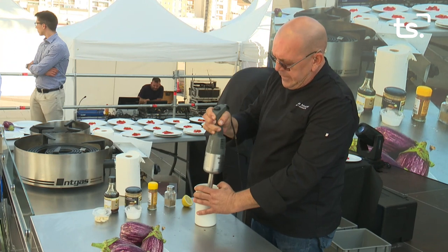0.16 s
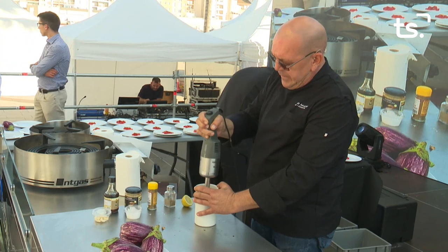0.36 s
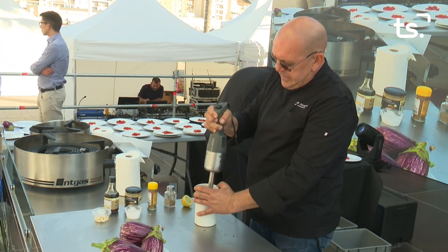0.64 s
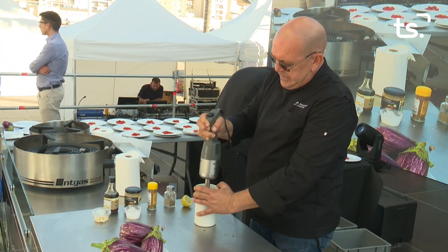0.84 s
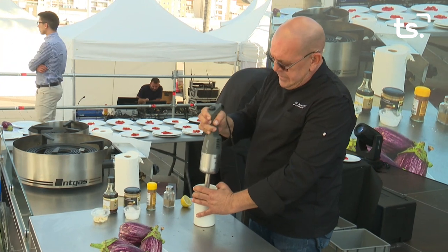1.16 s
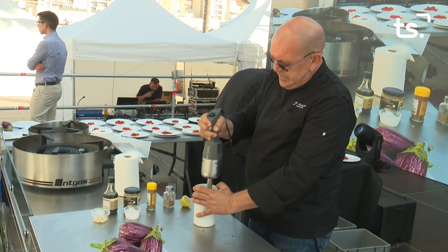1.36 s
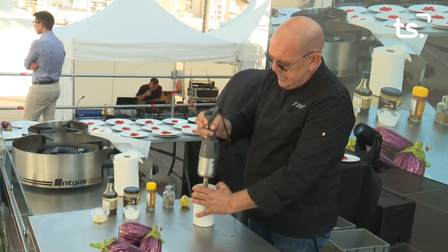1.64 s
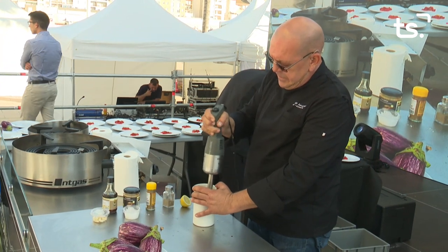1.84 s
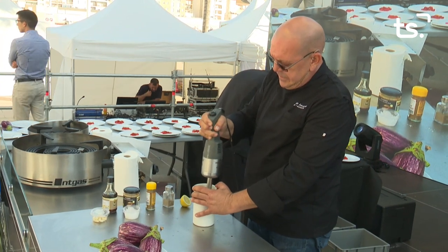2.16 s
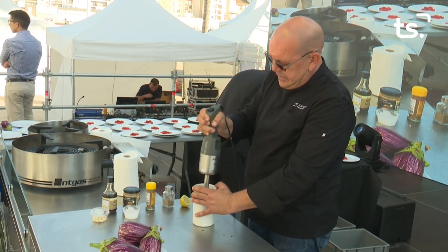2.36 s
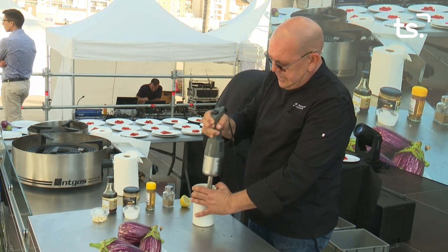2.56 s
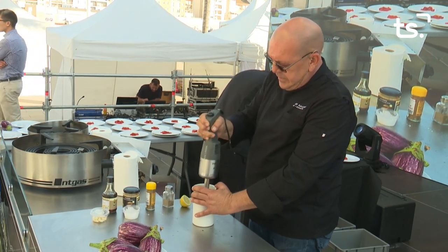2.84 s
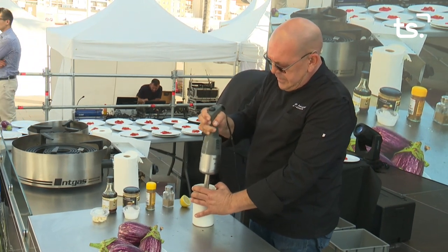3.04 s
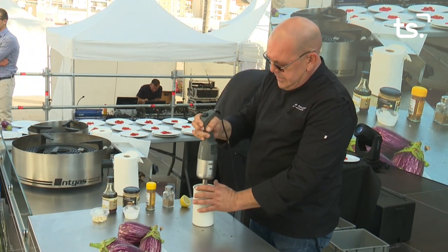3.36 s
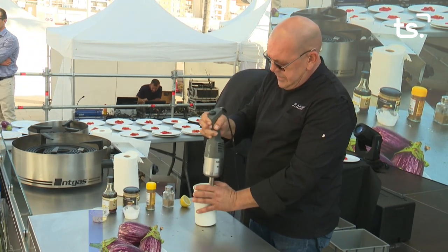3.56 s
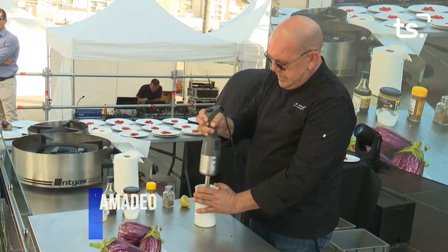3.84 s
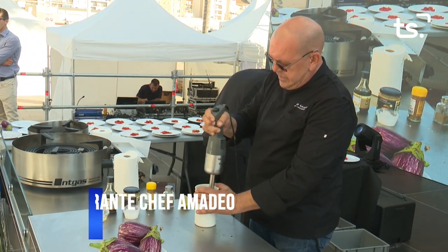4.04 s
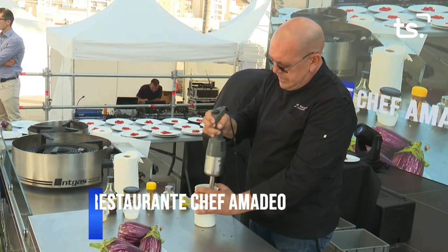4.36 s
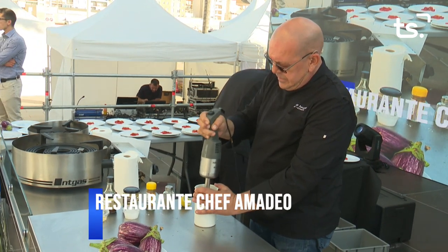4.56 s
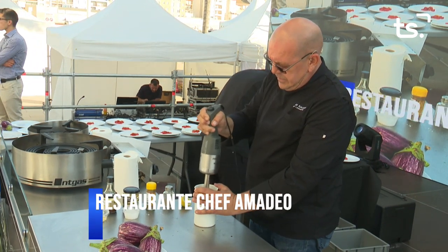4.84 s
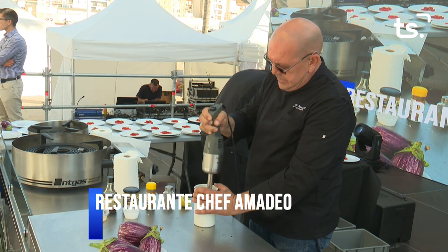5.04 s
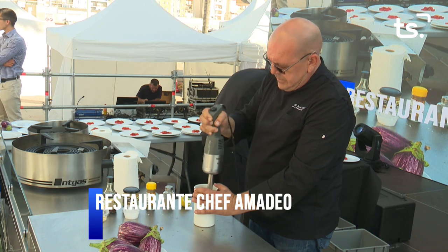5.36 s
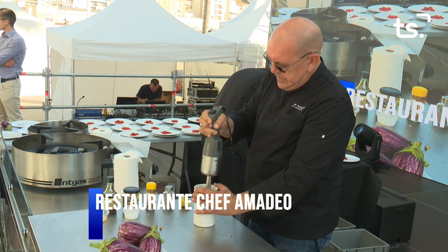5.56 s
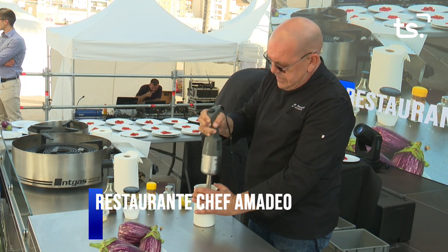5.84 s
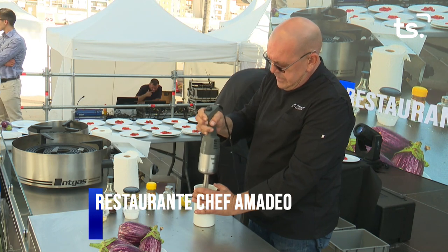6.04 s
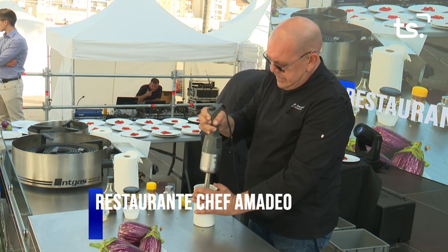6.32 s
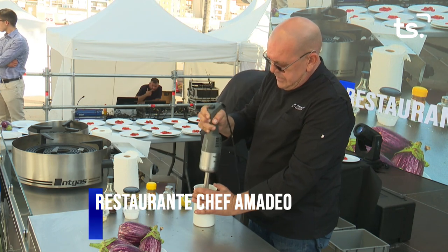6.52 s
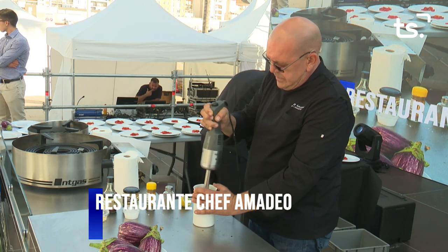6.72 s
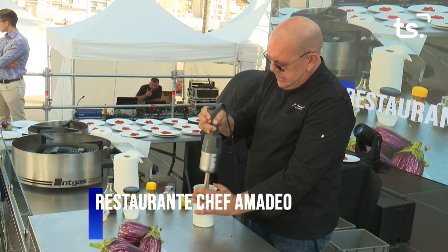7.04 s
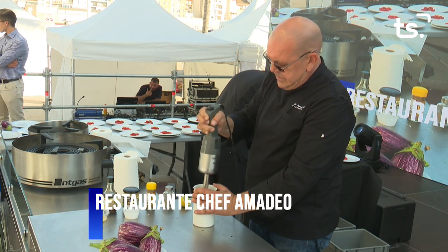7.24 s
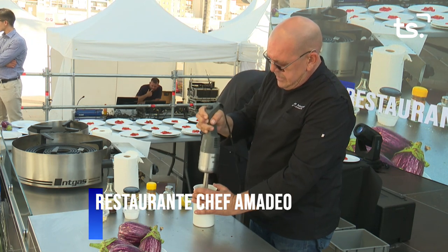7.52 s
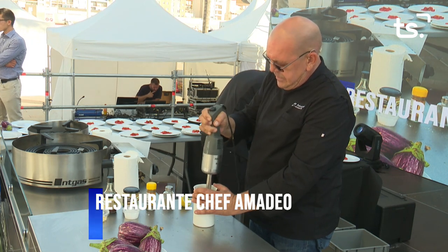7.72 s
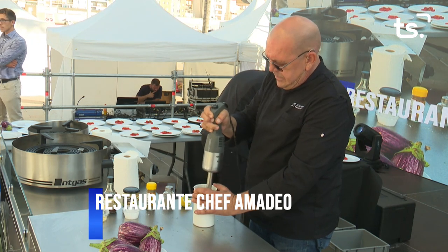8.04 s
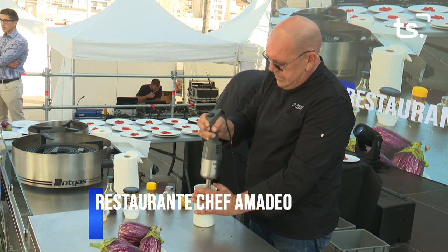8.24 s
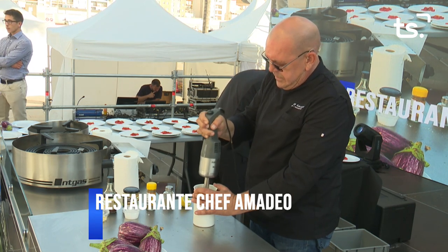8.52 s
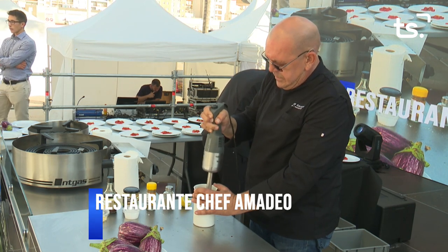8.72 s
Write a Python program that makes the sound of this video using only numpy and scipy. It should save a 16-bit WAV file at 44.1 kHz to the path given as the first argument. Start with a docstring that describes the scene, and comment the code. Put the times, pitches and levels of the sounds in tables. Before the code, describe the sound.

A stick blender runs throughout in a tall beaker, close to a microphone on an open-air stage. Its high whine sags and lifts as the blade hums and churns through thick food, with small wet spits. After a second or two, very high loudspeaker feedback whistles swell, slightly overloading the microphone. They fade past the middle and return more softly near the end.

```python
"""A stick blender purees thick food in a tall beaker, close to a microphone on an open-air stage.
Its motor whines, sagging in pitch each time the blade dips into the paste. The blade hums, churns
and spits, and the beaker rings along. The loudspeakers feed back into the microphone, so very high
whistles swell and die, and the loudest overload its input. A hand makes two soft bumps."""
import sys
import numpy as np
from scipy import signal
from scipy.fft import rfft, irfft, next_fast_len
from scipy.io import wavfile
from scipy.ndimage import uniform_filter1d, map_coordinates

SR = 44100
rng = np.random.default_rng(int(sys.argv[2]) if len(sys.argv) > 2 else 0)


def store_wav(level_fs):
    """Save 16-bit WAV to argv[1]."""
    pcm = np.round(np.clip(np.atleast_2d(level_fs), -1, 1) * 32767)
    wavfile.write(sys.argv[1], SR, pcm.T.astype(np.int16))


N = 392049
T = np.arange(N) / SR
TOP_HZ = 16000


def amp(db):
    """Turn decibels into a gain."""
    return 10 ** (np.asarray(db) / 20)


def unit(x):
    """Scale x to an average (rms) size of 1."""
    return x / np.sqrt(np.mean(x ** 2) + 1e-20)


def wobble(rate):
    """A smooth curve through `rate` random points a second."""
    return map_coordinates(rng.standard_normal(int(N * rate / SR) + 4), [T * rate])


def filtered(x, response):
    """Shape x with a gain that depends on frequency."""
    size = next_fast_len(N + SR // 2)
    return irfft(rfft(x, size) * response(np.fft.rfftfreq(size, 1 / SR)), size)[..., :N]


def noise(spectrum, patchy_db, bins, frames):
    """Shaped noise with louder and softer patches, `bins` wide and `frames` long."""
    hz, db = np.transpose(spectrum)
    grid = signal.stft(rng.standard_normal(N), nperseg=512)[2]
    patches = uniform_filter1d(uniform_filter1d(rng.standard_normal(grid.shape), bins, 0), frames, 1)
    patchy = signal.istft(grid * amp(patchy_db * np.minimum(unit(patches), 1.5)), nperseg=512)[1][:N]
    return unit(filtered(patchy, lambda f: amp(np.interp(np.log(f + 1), np.log(hz), db))))


def shaft_tones(table, angle, flicker_db, rate):
    """Tones that repeat a whole number of times per shaft turn, each flickering on its own."""
    return sum(np.sqrt(2) * amp(db + flicker_db * wobble(rate))
               * np.sin(cycles * angle + rng.uniform(0, 2 * np.pi)) for cycles, db in table)


def glide(times, values):
    """Move smoothly between the low and high points of the hand's strokes."""
    place = np.interp(T, times, np.arange(len(times)))
    step, part = np.floor(place), place % 1
    part = np.where(step % 2, part, part ** .75)  # the motor picks up speed early in each lift
    return np.interp(step + np.sin(np.pi / 2 * part) ** 2, np.arange(len(times)), values)


# Strokes of the hand, down into the paste and up again: (down time [s], whine there [Hz],
# up time [s], whine there [Hz], relative hum level [dB], relative churn level [dB])
STROKES = [(0, 3820, .23, 3941, -34, -31), (.44, 3786, .75, 3966, -39, -29),
           (.93, 3759, 1.17, 3882, -36, -33), (1.34, 3782, 1.55, 3885, -38, -33),
           (1.74, 3796, 1.88, 3890, -44, -34), (1.93, 3884, 2.02, 3988, -46, -32),
           (2.14, 3844, 2.41, 3938, -39, -34), (2.53, 3866, 2.66, 3950, -41, -36),
           (2.69, 3950, 2.76, 4064, -50, -36), (2.9, 3828, 3.09, 3957, -45, -39),
           (3.2, 3874, 3.3, 3910, -42, -38), (3.43, 3965, 3.6, 4008, -44, -35),
           (3.98, 3920, 4.17, 4037, -49, -41), (4.35, 3885, 4.51, 3978, -48, -38),
           (4.66, 3856, 4.84, 3939, -40, -38), (4.99, 3836, 5.12, 3902, -46, -37),
           (5.31, 3836, 5.49, 3967, -37, -35), (5.61, 3903, 5.71, 3951, -43, -40),
           (5.89, 3890, 6.03, 3946, -48, -36), (6.15, 3829, 6.29, 3875, -39, -37),
           (6.4, 3848, 6.5, 3875, -49, -38), (6.62, 3829, 7.05, 4044, -45, -39),
           (7.15, 3965, 7.22, 3977, -53, -41), (7.38, 3891, 7.55, 4117, -41, -42),
           (7.7, 3930, 7.78, 3932, -48, -40), (7.94, 3853, 8.08, 3931, -47, -38),
           (8.27, 3842, 8.47, 3907, -40, -36), (8.6, 3835, 8.83, 3912, -44, -38)]
def strokes():
    """Lifting the blade frees the motor: the pitch rises while hum and churn thin out."""
    down_s, down_hz, up_s, up_hz, hum_db, churn_db = np.transpose(STROKES)
    times = np.ravel([down_s, up_s], "F")

    def level(down_db, loss_db_per_hz):
        between_db = (down_db + np.append(down_db[1:], down_db[-1])) / 2
        up_db = between_db - loss_db_per_hz * (up_hz - down_hz)
        return glide(times, np.ravel([down_db, up_db], "F"))

    return glide(times, np.ravel([down_hz, up_hz], "F")), level(hum_db, .11), level(churn_db, .035)


# The motor's whining tones: (cycles per turn, relative level [dB])
WHINE_TONES = [(16, -15), (18, 4)]
SLOTS = 18  # cycles of the main whine per turn
def whine(angle, level_db):
    """The spinning motor sings; a tone an octave above comes and goes."""
    octave = shaft_tones([(2 * SLOTS, -19)], angle, flicker_db=4, rate=6)
    return amp(level_db - 4.04) * (shaft_tones(WHINE_TONES, angle, flicker_db=1.05, rate=12) + octave)


# The blade's tone: (cycles per turn, relative level [dB])
BLADE_TONE = [(2, -2.2)]
def blade_hum(angle, level_db):
    """The blade hums unsteadily at twice the turning speed."""
    return amp(level_db) * shaft_tones(BLADE_TONE, angle + .4 * wobble(30), flicker_db=2.8, rate=25)


# Where the beaker's air and wall ring: (pitch [Hz], width [Hz], relative level [dB])
BEAKER_RINGS = [(373, 178, -8), (820, 120, 3.6), (2005, 570, -12.5)]
def beaker(x):
    """The beaker rings along with a sound inside it and thins out the bass."""
    def response(f):
        rings = sum((-1) ** k * amp(db) * 1j * f * width / (hz * hz - f * f + 1j * f * width)
                    for k, (hz, width, db) in enumerate(BEAKER_RINGS))
        return rings * 1j * f / (250 + 1j * f)

    return filtered(x, response)


def churn(level_db):
    """Paste goes through the blade in uneven gulps that ring the beaker."""
    gulps = amp(1.2 * wobble(25) + 1.9 * wobble(80))
    return amp(level_db - 1.2) * unit(beaker(gulps * rng.standard_normal(N)))


def shaft_hum(angle, effort_db):
    """The shaft hums once per turn, louder when the blender works harder."""
    level_db = -63 + .9 * (effort_db - np.mean(effort_db))
    return amp(level_db) * shaft_tones([(1, 0)], angle, flicker_db=1.5, rate=15)


# Noise of the fan, the motor's brushes and the swirl: (frequency [Hz], relative level [dB])
RUSH_SPECTRUM = [(35, -25), (90, -17), (330, -7.5), (830, -12.5), (1370, -18), (3860, -8.5), (7900, -17),
                 (9500, -16), (12800, -14), (13600, -36)]
def rush(motor_db, churn_db, load):
    """Fan and brushes hiss more under load; the part below about 1500 Hz is swirling paste."""
    air = noise(RUSH_SPECTRUM, patchy_db=1.74, bins=9, frames=6)
    swirl = filtered(air, lambda f: 1 / (1 + (f / 1500) ** 2))
    hiss = amp(motor_db - 1.42 + 1.2 * load) * (air - swirl)
    return hiss + amp((churn_db + motor_db) / 2 - 1.6) * swirl


# A very high, patchy hiss: (frequency [Hz], relative level [dB])
SHIMMER_SPECTRUM = [(5590, -70), (9500, -40), (11700, 8), (15200, -2), (16000, -21)]
# A thin tone within that hiss: (cycles per turn, relative level [dB])
SHIMMER_TONE = [(54, -11)]
def shimmer(angle, level_db):
    """A faint, flickering treble hiss with one thin tone in it."""
    hiss = amp(-4.5) * noise(SHIMMER_SPECTRUM, patchy_db=13, bins=4, frames=9)
    return amp(level_db) * (hiss + shaft_tones(SHIMMER_TONE, angle, flicker_db=4, rate=30))


# Lower notes of the loop from loudspeaker to microphone: (pitch [Hz])
LOOP_NOTES = [4453, 4588]
def loop_ringing(x, width_hz=6):
    """The motor's rush sets narrow notes of the loop ringing; each comes and goes."""
    def ring(hz):
        return filtered(x, lambda f: 1j * f * width_hz / (hz * hz - f * f + 1j * f * width_hz))

    return sum(amp(3 + 3 * wobble(3)) * ring(hz) for hz in LOOP_NOTES)


# The motor's slowly changing loudness: (time [s], relative level [dB])
MOTOR_LEVEL = [(0.48, -29), (1.21, -35.1), (2.16, -31.5), (2.46, -36.0), (2.73, -32), (3.01, -37),
               (3.65, -35.5), (3.97, -40), (4.15, -34), (4.29, -37.5), (8.79, -38)]
def blender():
    """The blender's whine, hum, churn and rush in the centre; alongside them plays a faint, wide, flickering
    treble hiss."""
    hz, hum_db, churn_db = strokes()
    whine_db = np.interp(T, *np.transpose(MOTOR_LEVEL))
    motor_db = uniform_filter1d(whine_db, SR // 3)
    load = (uniform_filter1d(hz, SR // 2) - hz) / 50  # high when thick paste slows the motor
    angle = 2 * np.pi * np.cumsum(hz + 3 * wobble(150)) / SR / SLOTS
    angle += .017 * np.sin(2 * np.pi * 100 * T)  # mains power pushes twice per cycle
    centre = whine(angle, whine_db) + blade_hum(angle, hum_db) + churn(churn_db)
    centre += shaft_hum(angle, churn_db + motor_db)
    rushing = rush(motor_db, churn_db, load)
    wide = shimmer(angle, motor_db)
    return centre + rushing + loop_ringing(rushing), wide


# Spits of food and air: (time [s], relative crackle level [dB], relative plop level [dB], length [s])
SPITS = [(.652, -24, -38, .015), (.752, -21, -28, .03), (1.115, -26, -27, .015), (1.158, -25, -40, .02),
         (1.944, -22, -23.5, .013), (2.683, -20.5, -16, .017), (2.772, -19.5, -33, .032),
         (4.118, -20.5, -33, .04), (5.15, -27, -40, .015), (5.689, -28, -26, .05),
         (5.721, -24.5, -29, .015), (5.969, -18.5, -46, .012), (6.23, -26, -40, .014),
         (6.451, -27, -29, .016), (6.512, -25, -41, .016), (6.686, -28, -27.5, .055),
         (6.758, -25, -36, .016), (6.908, -29, -38, .035), (6.985, -30, -44, .035), (7.176, -26, -32, .028),
         (7.425, -26, -32, .034), (7.63, -35, -32, .04), (8.755, -24, -33, .015)]
def spits():
    """Each spit is a spiky burst of crackle and a few plops that ring the beaker."""
    crackle, plops = np.zeros((2, N + SR))
    t = np.arange(SR // 5) / SR
    for start, crackle_db, plop_db, length in SPITS:
        age = 3 * t / length
        swell = np.sqrt(age) * np.exp(1 - age)  # a quick rise, then a fade
        spikes = rng.standard_normal((2, len(t))) * amp(4.6 * rng.standard_normal(len(t)))
        crackle[round(start * SR):][:len(t)] += amp(crackle_db - 2.5) * swell * spikes[0]
        plops[round(start * SR):][:len(t)] += amp(plop_db + 12) * swell * spikes[1]
    bright_band = lambda f: (1j * f / (1000 + 1j * f)) ** 2 / (1 + 1j * f / 9000) ** 4
    hollow_band = lambda f: (1j * f * 700 / (830 ** 2 - f * f + 1j * f * 700)) ** 2
    return filtered(crackle[:N], bright_band) + filtered(beaker(plops[:N]), hollow_band)


def whistle(hz, db, spacing_hz=38):
    """One note of the feedback loop; its neighbours on both sides ring faintly."""
    db = db - 20 * np.maximum(-38 - db, 0) * (hz > TOP_HZ / 2)  # high notes drop away steeply below -38 dB
    phase = 2 * np.pi * np.cumsum(hz) / SR
    beat = 2 * np.pi * spacing_hz * T
    neighbours = .055 * (wobble(12) * np.cos(beat) + wobble(12) * np.sin(beat))
    return amp(db + 3.5) * (np.sin(phase) + neighbours * np.sin(phase + .39))


# The two loudest whistles, a list for each: (time [s], pitch [Hz], relative level [dB])
LONG_WHISTLES = [
    [(1.6, 13662, -40), (1.79, 13663, -13), (1.91, 13663, -12), (2.03, 13664, -17), (2.25, 13666, -4.6),
     (2.57, 13669, -4.6), (2.97, 13673, -13), (3.16, 13673, -11), (3.26, 13672, -14), (3.43, 13672, -10),
     (3.71, 13670, -14), (4.07, 13669, -8), (4.33, 13669, -8), (4.7, 13676, -20), (4.86, 13677, -33)],
    [(4.36, 13642, -40), (4.45, 13642, -28), (4.845, 13643, -29), (4.87, 13643, -54), (4.9, 13642, -28),
     (5.09, 13644, -22), (5.23, 13646, -11), (5.91, 13646, -7), (6.03, 13645, -12), (6.16, 13644, -13),
     (6.41, 13643, -26), (6.46, 13643, -39)],
]
# Whistles that swell once: (start [s], peak [s], end [s], pitch [Hz], relative peak level [dB])
SHORT_WHISTLES = [(1.72, 2.06, 2.28, 13627, -17), (1.57, 1.8, 2.16, 14183, -13),
                  (1.58, 1.83, 2.15, 14220, -16), (1.95, 2.2, 2.72, 14221, -18),
                  (1.67, 1.79, 2.02, 14579, -22), (2.04, 2.11, 2.32, 14584, -26),
                  (7.06, 7.09, 7.13, 13641, -31), (7.16, 7.26, 7.39, 13641, -27),
                  (7.52, 7.92, 8.42, 14505, -14), (7.97, 8.68, 9.6, 14035, -16.5),
                  (7.55, 8.7, 10, 13639, -29.5), (7.5, 9.8, 10, 4588, -34)]
# The hiss around the whistles: (frequency [Hz], relative level [dB])
WHISTLE_HISS = [(13350, -70), (13500, 0), (14700, -3), (15300, -70)]
def feedback():
    """Sound circles from loudspeaker to microphone, so whistles grow and die. A hiss rides along."""
    whistles = sum(whistle(np.interp(T, times, hz), np.interp(T, times, db, -200, -200))
                   for times, hz, db in map(np.transpose, LONG_WHISTLES))
    for start, peak, end, hz, db in SHORT_WHISTLES:
        before = np.clip((peak - T) / (peak - start), 0, 9)
        after = np.clip((T - peak) / (end - peak), 0, 9)
        cut_db = 200 * np.maximum(np.maximum(before, after) - 1, 0)  # silence outside the swell
        whistles += whistle(np.full(N, hz), db - 32 * (before ** 2.2 + after ** 1.8) - cut_db)
    level = uniform_filter1d(np.abs(whistles), SR // 50)
    hiss_gain = amp(-44) * np.abs(level) ** .25 * np.clip(level * 150, 0, 1)
    return whistles + hiss_gain * noise(WHISTLE_HISS, patchy_db=2, bins=30, frames=4)


# Knocks of a hand: (time [s], level [dB], pitch [Hz])
BUMPS = [(2.53, -42, 50), (6.33, -44, 95)]
def bumps():
    """A hand knocks the microphone or table: soft, low thuds about two cycles long."""
    return sum(amp(db) * np.exp(-((T - time) * hz) ** 2) * np.sin(2 * np.pi * hz * (T - time))
               for time, db, hz in BUMPS)


# Faint, very high whistles: (start [s], end [s], pitch [Hz], level [dB])
FAINT_WHISTLES = [(6.45, 8.05, 13639, -31), (7.05, 7.6, 14507, -36)]
def faint_whistles():
    """Faint, very high, wavering whistles, heard wide because left and right swing opposite ways."""
    whistles = np.zeros(N)
    for start, end, hz, db in FAINT_WHISTLES:
        fade = np.clip(np.minimum(T - start, end - T) * 60, 0, 1)
        whistles += amp(db + 2 * wobble(15)) * fade * np.sqrt(2) * np.sin(2 * np.pi * hz * T)
    return whistles


def scene():
    """Nearly everything is in the centre; faint treble is added on the left, subtracted on the right."""
    centre, wide = blender()
    centre = centre + spits() + bumps() + feedback()
    wide = wide + faint_whistles()
    return np.array([centre + wide, centre - wide])


def record(dry, full_scale=.98, input_rate_hz=48000):
    """Loud whistles overload the input, which squashes their peaks and adds lower tones."""
    analytic = signal.hilbert(dry, next_fast_len(N))[:, :N]  # holds the wave's size and phase
    size = np.abs(analytic) + 1e-9
    squashed = dry / (1 + (size / full_scale) ** 12) ** (1 / 12)
    lost = np.abs(dry - squashed) / (np.abs(dry) + 1e-9) * size
    difference_tones = filtered(.018 * size ** 2, lambda f: (1j * f / (45 + 1j * f)) ** 2)
    # an overtone at three times the pitch is too high for the converter and folds down
    folded = np.real(np.conj(analytic / size) ** 3 * np.exp(2j * np.pi * input_rate_hz * T))
    return filtered(squashed + difference_tones + amp(-16) * lost * folded, lambda f: f < TOP_HZ)


dry = scene()
out = record(dry)
store_wav(out)
```